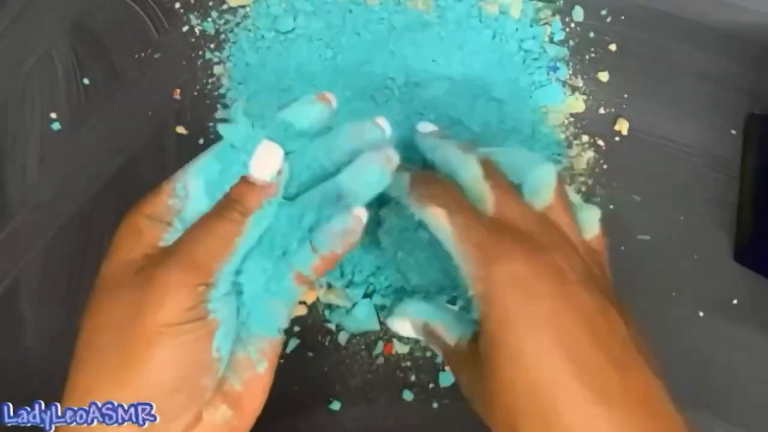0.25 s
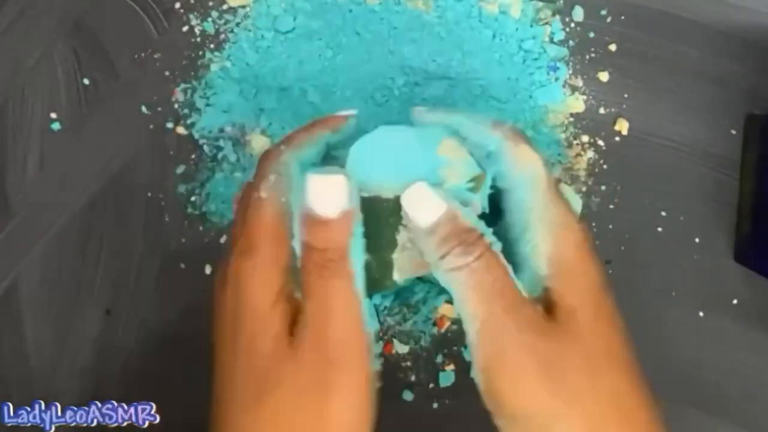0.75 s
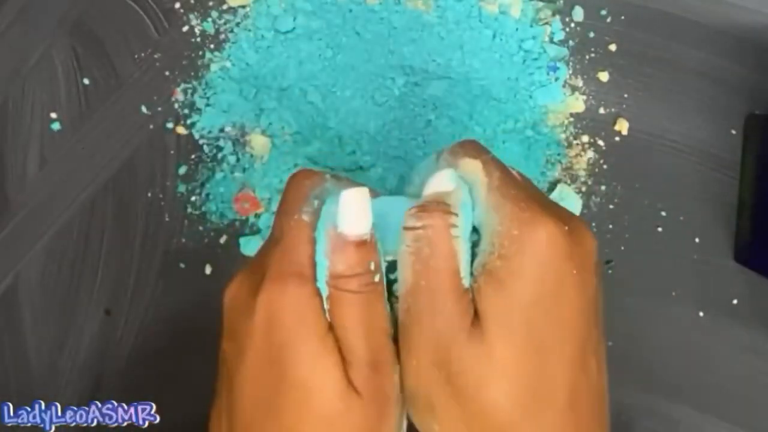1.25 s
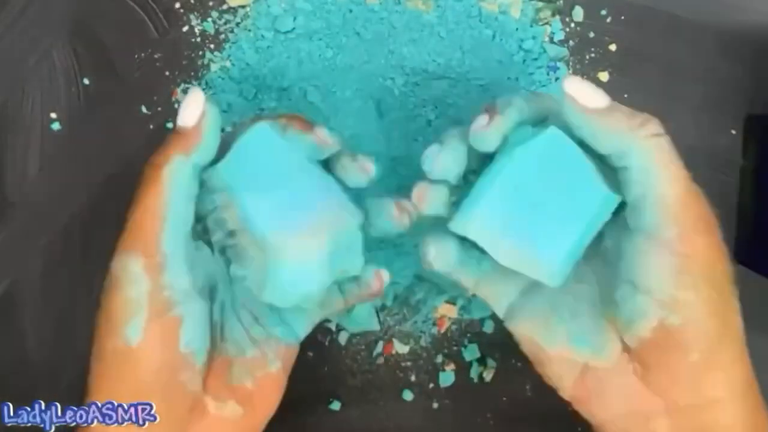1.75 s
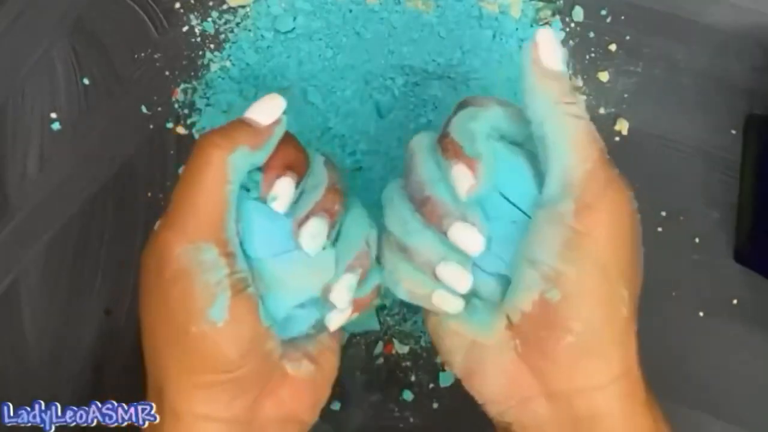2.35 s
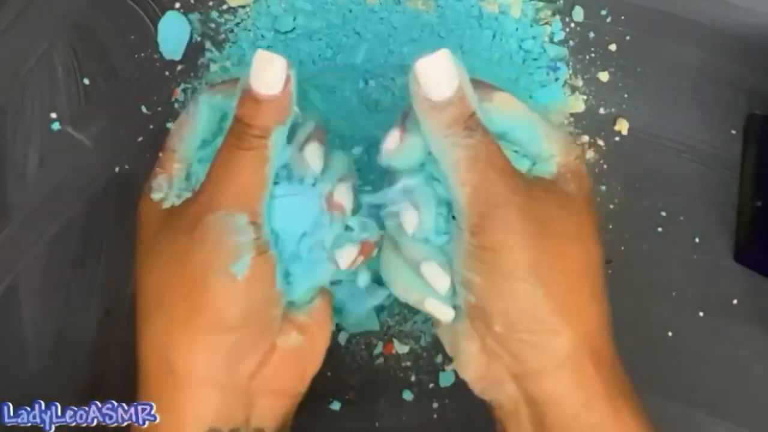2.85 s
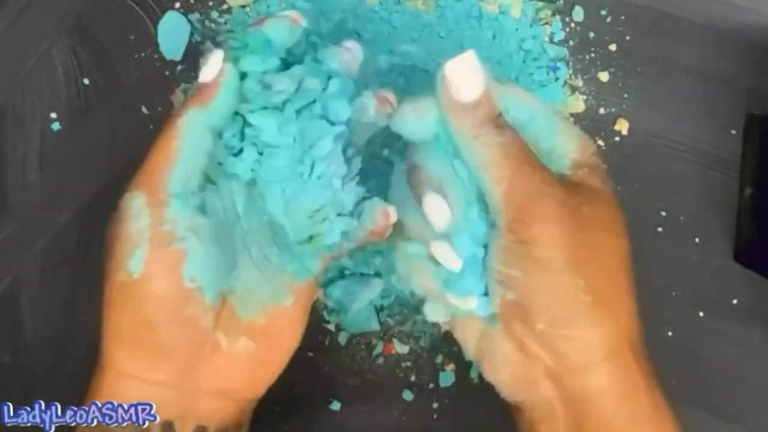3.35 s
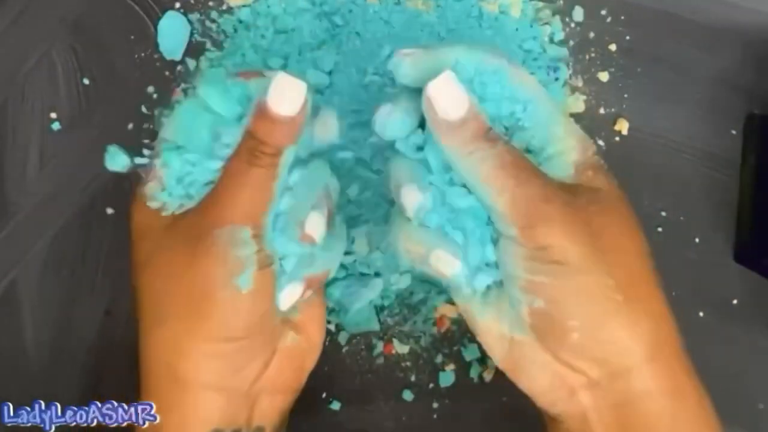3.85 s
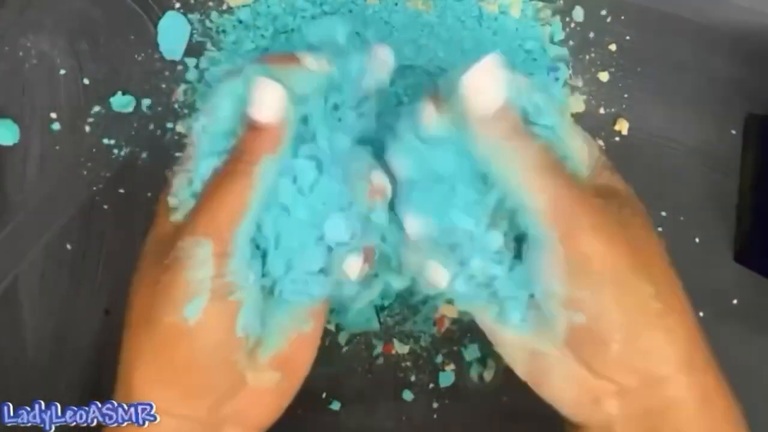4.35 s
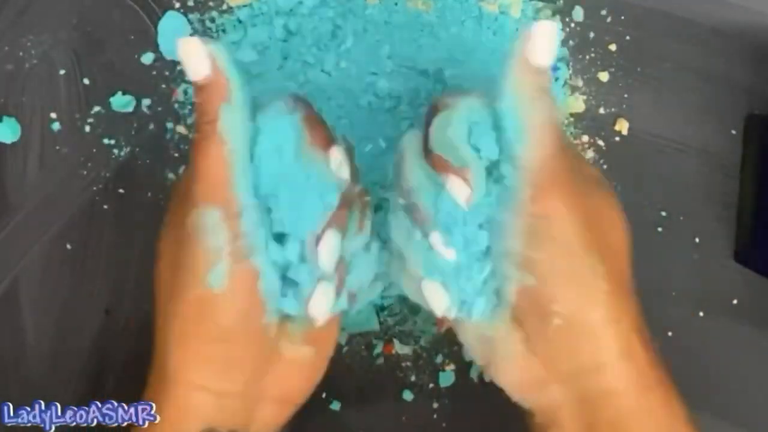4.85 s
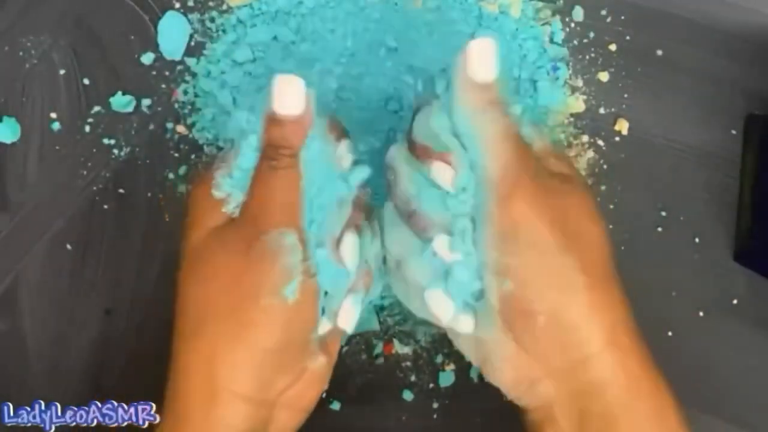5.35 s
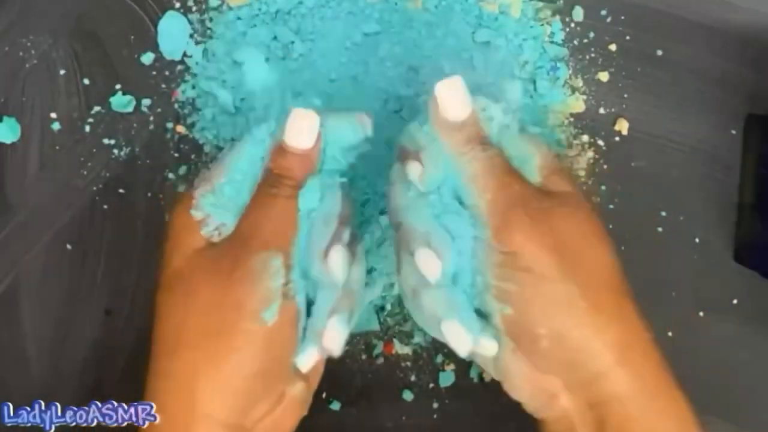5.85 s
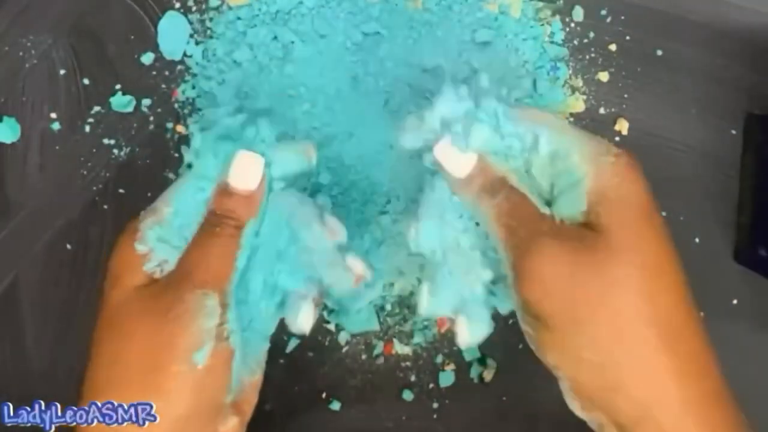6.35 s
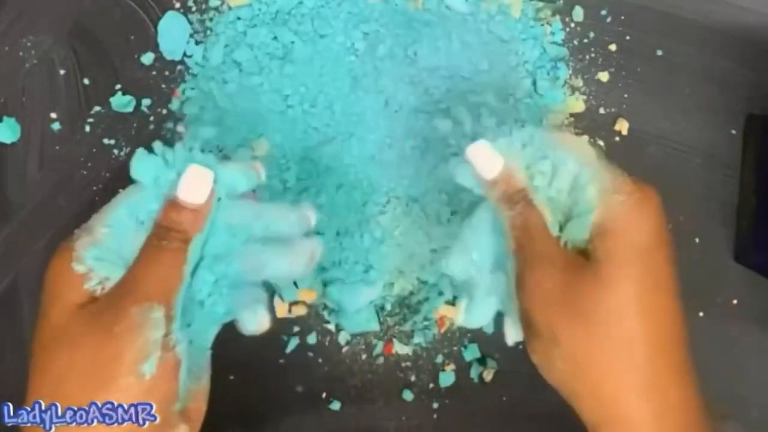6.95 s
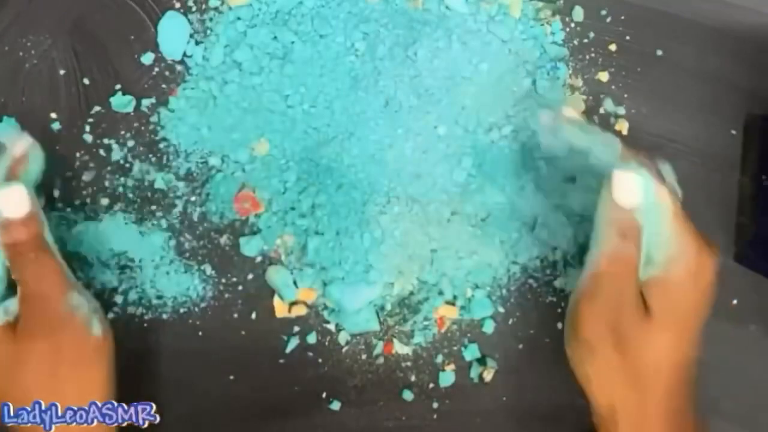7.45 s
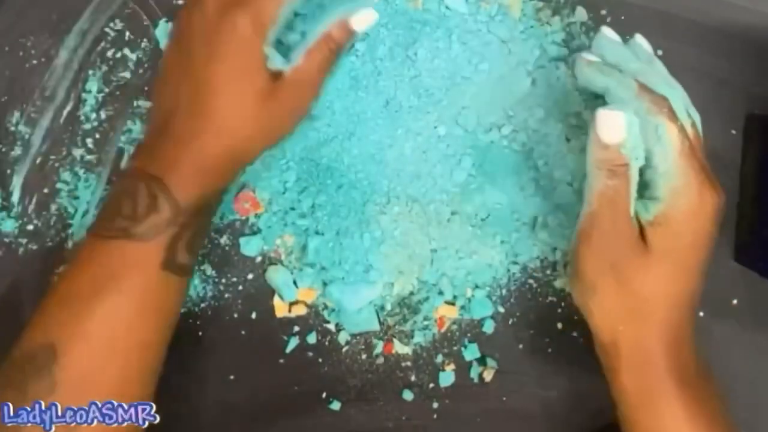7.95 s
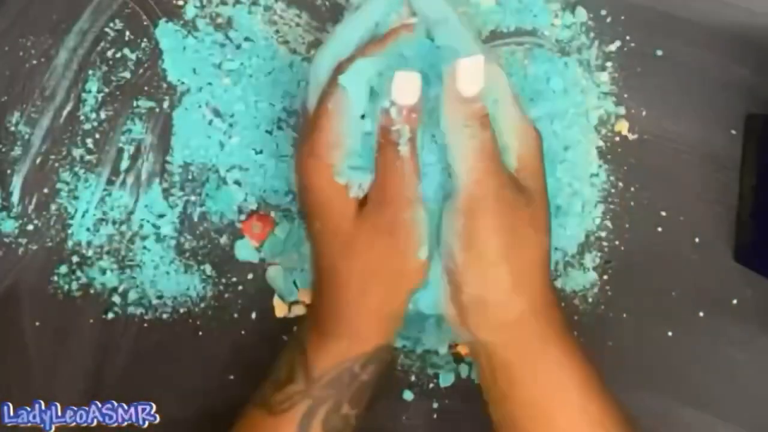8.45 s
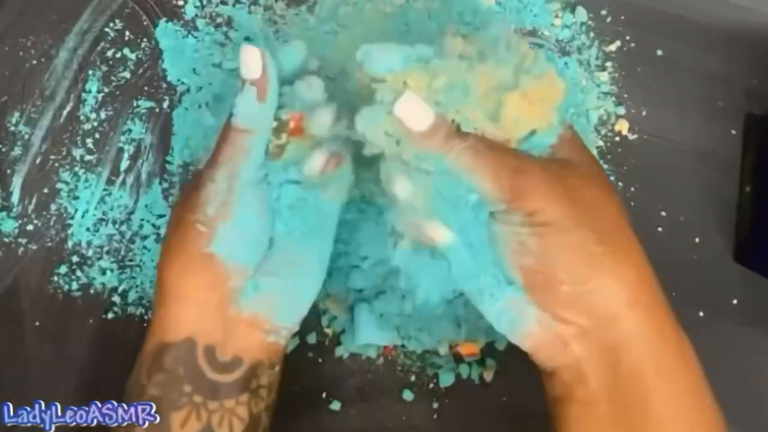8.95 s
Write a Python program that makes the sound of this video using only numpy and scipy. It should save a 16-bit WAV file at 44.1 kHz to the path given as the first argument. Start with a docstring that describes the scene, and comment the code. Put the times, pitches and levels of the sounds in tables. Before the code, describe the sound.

Two hands work soft chalk over a hard table, recorded close in stereo with little room echo. Light powder rubbing comes first, then a sharp split, clustered snaps and irregular crunches with trickling crumbs. These thin into quieter, powdery crackles. Bright, rough sweeping bursts with tumbling pieces follow, loudest of all in grit, then a sharp crack and a few more crumbling squeezes over low rumble.

```python
"""Soft chalk is broken, crushed to powder and swept together on a table by two hands.
Lumps crack as noise bursts through four resonances; crumbs trickle and rustle as noise in six bands of grains.
Thumps are falling tones in the table top, squeaks narrow noise; a low hum wavers in the room.
A phone with two microphone ports lies close by, so the treble reaches the left port a little late."""
import sys
import numpy as np
from scipy import signal
from scipy.fft import rfft, irfft
from scipy.io import wavfile
from scipy.ndimage import uniform_filter1d

SR = 44100
rng = np.random.default_rng(int(sys.argv[2]) if len(sys.argv) > 2 else 0)


def transcribe(u):
    """Save the signal u as a 16-bit wav file named by the first command-line argument.

    u: samples, shape (n,) or (channels, n), limited to [-1, 1]; the rate is SR.
    q: integer samples, one column per channel.
    """
    v = np.clip(np.atleast_2d(u).T, -1, 1)
    q = np.round(v * 32767).astype(np.int16)
    wavfile.write(sys.argv[1], SR, q)


def attenuation_scalar(level_db):
    """Turn a level in dB into a linear amplitude multiplier (20 dB per decade)."""
    decades = np.asarray(level_db, float) / 20
    return 10 ** decades


N = 406161

BASS_LEFT_DB = 3.5  # low chalk sound leans left
HUM_PAN_DB = 4.5  # hum and thumps lean left


def curve(table, column):
    """One column of a time table, at every sample."""
    rows = np.array(table)
    return np.interp(np.arange(N) / SR, rows[:, 0], rows[:, column])


def along_hz(table):
    """A (Hz, value) table at every frequency bin, interpolated over log frequency."""
    hz, value = np.transpose(table)
    bin_hz = np.arange(N // 2 + 1) * SR / N
    return np.interp(np.log(bin_hz + 1), np.log(hz), value)


def unit(x):
    """Scale to rms 1."""
    return x / np.sqrt(np.mean(x ** 2))


def band(x, lo_hz, hi_hz, order=2):
    """Band-pass between two edges."""
    edges_hz = [lo_hz, min(hi_hz, SR / 2.2)]
    return signal.sosfilt(signal.butter(order, edges_hz, "bandpass", fs=SR, output="sos"), x)


def ring(x, hz, width_hz):
    """One resonance."""
    return signal.lfilter(*signal.iirpeak(hz, hz / width_hz, fs=SR), x)


def sides(pan_db):
    """Left and right gains; positive leans left."""
    return attenuation_scalar(np.array([pan_db, -pan_db]) / 2)


def two_ports(noise, likeness):
    """From three unrelated noises, a left and a right that share the first."""
    likeness = np.clip(likeness, 0, 1)
    return np.sqrt(likeness) * noise[0] + np.sqrt(1 - likeness) * noise[1:]


def walk(rate):
    """Slow chance with spread 1: noise averaged twice over 1/rate s."""
    size = int(SR / rate)
    return unit(uniform_filter1d(uniform_filter1d(rng.standard_normal(N), size=size), size=size))


# Kneading, in four stretches. Each row: time in s, then crushing, rubbing and tumbling lumps in dB before the crumb mix.
KNEADING = [
    [(0.0, -57.5, -51, -29), (0.12, -60.5, -55, -60), (0.56, -64.5, -52.5, -59), (0.74, -70, -57.5, -48),
     (0.91, -69, -55, -99), (1.0, -66, -48, -63.5), (1.06, -66, -47, -54), (1.13, -67.5, -60.5, -51),
     (1.24, -65.5, -64, -56), (1.47, -62.5, -67.5, -55), (1.55, -49.5, -78, -26), (1.62, -54.5, -60, -39),
     (1.68, -62.5, -39.5, -87), (1.73, -60, -42.5, -75), (1.83, -53.5, -47.5, -58),
     (1.89, -54.5, -35.5, -59), (2.05, -54, -50, -71)],
    [(2.06, -52.5, -44, -59), (2.16, -52, -44, -63), (2.31, -42.5, -57, -55), (2.64, -42, -43, -54),
     (2.77, -47, -45, -33), (2.94, -40, -42, -44), (3.16, -48.5, -51, -82), (3.42, -51, -47, -38),
     (3.58, -61.5, -79, -58), (3.81, -55.5, -41.5, -39), (3.97, -47.5, -46, -48), (4.03, -46.5, -45, -46),
     (4.08, -47.5, -44, -45), (4.15, -39, -44.5, -45), (4.3, -34.5, -44, -35), (4.39, -45.5, -54, -45),
     (4.49, -54.5, -51, -48), (4.58, -46, -43, -40.5), (4.67, -44, -46, -40), (4.76, -49.5, -43, -60),
     (4.86, -49.5, -46, -52), (4.95, -59.5, -44.5, -59)],
    [(4.96, -61, -53, -68), (5.05, -62, -55, -55), (5.12, -58, -54, -47), (5.16, -53.5, -44.5, -47.5),
     (5.3, -46, -49.5, -41), (5.37, -50, -46.5, -54), (5.47, -52.5, -46, -58), (5.54, -53, -49, -62),
     (5.6, -66, -54.5, -68), (5.655, -63.5, -57, -63), (5.69, -55.5, -56, -57), (5.75, -52.5, -47, -42.5),
     (5.86, -46.5, -51, -46), (5.94, -46.5, -44, -48), (6.05, -56, -52.5, -55), (6.15, -51, -56, -39),
     (6.23, -56, -62, -53), (6.3, -50, -50.5, -57), (6.42, -55.5, -52, -56), (6.52, -53.5, -48, -46),
     (6.62, -57, -49, -55), (6.69, -61.5, -55, -51), (6.78, -57, -52, -53), (6.88, -57, -54.5, -52),
     (6.97, -56.5, -45.5, -39), (7.05, -59, -49.5, -58), (7.14, -64, -52.5, -66), (7.2, -55, -47.5, -59),
     (7.3, -56.5, -50.5, -37), (7.38, -62.5, -53.5, -56), (7.48, -72.5, -57.5, -70), (7.6, -60.5, -60, -33)],
    [(8.46, -44, -66, -39), (8.54, -41, -51, -35), (8.602, -47, -51, -39), (8.66, -40.5, -53, -32),
     (8.742, -45, -51, -42), (8.8, -51, -48.5, -41), (8.858, -53, -50.5, -59), (9.008, -50, -52.5, -50),
     (9.21, -45.5, -45, -37)],
]
# The left hand sweeps the heap together. Each row: the same columns.
SWEEP = [(7.63, -63, -56, -75), (7.67, -27, -43, -40.5), (7.73, -35.5, -36, -25), (7.79, -23, -32.5, -28),
         (7.85, -24, -34.5, -36.5), (7.9, -24.5, -36.5, -42), (7.936, -38.5, -36.5, -33),
         (7.99, -34, -38.5, -29.5), (8.046, -31.5, -42, -38), (8.096, -33, -42.5, -16.5),
         (8.15, -33.5, -43, -23.5), (8.222, -35, -40.5, -29), (8.294, -30.5, -39.5, -17),
         (8.362, -44, -46.5, -34.5), (8.4, -40, -47.5, -21.5), (8.43, -47.5, -54, -51)]


def work():
    """Crushing, rubbing and tumbling levels of the hands at every sample, in dB."""
    rows = sorted(sum(map(list, KNEADING), list(SWEEP)))
    return np.array([curve(rows, k) for k in range(1, 4)])


def octaves_from(size, hz):
    """Distance of a pitch from the middle of a crumb size's band."""
    return np.abs(np.log2(hz / np.sqrt(size[0] * size[1])))


SHOWER_DB_PER_OCTAVE = 3.5
SHOWER_FADE_S, SHOWER_FADE_EXPONENT = 0.017, 0.0099  # fade at 1000 Hz, longer for coarse crumbs


def shower(size, db):
    """Power of one crumb size running off after each crack: most near its knock pitch, powder after a bright snap."""
    s, snap_db, knock_db, hz, _ = np.transpose(CRACKS)
    if size in CRUMB_SIZES[-2:]:
        source_db = snap_db
    else:
        source_db = knock_db - SHOWER_DB_PER_OCTAVE * octaves_from(size, hz)
    power = np.zeros(N)
    power[(s * SR).astype(int)] = attenuation_scalar(db + source_db) ** 2
    fade_s = SHOWER_FADE_S * (1000 / size[0]) ** SHOWER_FADE_EXPONENT
    return signal.lfilter([1], [1, -np.exp(-1 / (fade_s * SR))], power)


# Lumps giving way. Each row: start in s, level in dB at the crumb pitch before the rise, crumb pitch in Hz, fade in s.
COLLAPSES = [(.001, -18, 540, 0.0046), (0.268, -23, 433, 0.016), (.17, -37, 4550, 0.051),
             (.53, -62, 1000, 0.016), (0.669, -41.5, 2000, 0.014), (.893, -31, 11000, 0.0084),
             (1.5, -16.5, 447, 0.028), (1.505, -27.5, 760, 0.028), (1.83, -28, 484, 0.019),
             (2.11, -36, 2500, 0.039), (2.24, -24, 4930, 0.043), (2.344, -20.5, 2370, 0.041),
             (2.595, -26, 520, 0.03), (2.599, -28, 1510, 0.075), (2.74, -24, 600, 0.024),
             (2.9, -38, 1810, 0.077), (3.06, -30.5, 2520, 0.038), (3.48, -22.5, 3680, 0.03),
             (3.81, -40.5, 2500, 0.19), (4.0, -28.5, 750, 0.011), (4.21, -20.5, 1870, 0.06),
             (4.649, -29.5, 2400, 0.06), (5.28, -36, 1890, 0.091), (5.9, -40, 2500, 0.03),
             (6.08, -52, 1800, 0.043), (6.26, -37.5, 1830, 0.045), (6.583, -24, 430, 0.0081),
             (6.6, -46, 400, 0.028), (6.96, -43.5, 344, 0.046), (6.995, -39.5, 335, 0.04),
             (7.07, -41, 496, 0.016), (8.45, -33, 4350, 0.053)]
COLLAPSE_DB_PER_OCTAVE, COLLAPSE_RISE_S = 11.5, 0.00092


def collapse(size):
    """Power of the crumbs of one size that pour out while lumps give way."""
    t, power = np.arange(0, N, 64) / SR, 0
    for s, db, hz, fade_s in COLLAPSES:
        after = np.maximum(t - s, 0)
        peak = attenuation_scalar(db - COLLAPSE_DB_PER_OCTAVE * octaves_from(size, hz)) ** 2
        power = power + peak * (1 - np.exp(-after / COLLAPSE_RISE_S)) * np.exp(-after / fade_s)
    return np.interp(np.arange(N) / SR, t, power)


DENSE_DB, DENSE_PER_DB = -40, 0.015  # above this level grains overlap and merge into hiss


def crumbs(size, level_db, crackle):
    """Tiny grains of uneven size, each a short puff, over the hiss of sliding powder."""
    lo_hz, hi_hz, rate, spread_db, smooth, likeness = size
    falls = rng.random(N) < rate / SR
    falls = falls * attenuation_scalar(spread_db * np.minimum(rng.exponential(size=N), 3.5)) + crackle
    puffs = unit(signal.lfilter([1], [1, -np.exp(-lo_hz / SR / 3.16)], falls))
    smooth = np.clip(smooth + DENSE_PER_DB * np.maximum(level_db - DENSE_DB, 0), 0, .9)
    power = (1 - smooth) ** 2 + smooth ** 2 + 2 * smooth * (1 - smooth) * np.mean(puffs)
    envelope = ((1 - smooth) * puffs + smooth) / np.sqrt(power)
    mix = envelope * two_ports(rng.standard_normal((3, N)), likeness)
    return attenuation_scalar(level_db) * unit(band(mix, lo_hz, hi_hz, order=3))


# Crumb sizes, coarse to fine. Each row: lowest and highest Hz, grains per s, size spread in dB,
# least share of smooth hiss 0-1, likeness at the two ports 0-1.
CRUMB_SIZES = [(211, 560, 220, 5, 0, 0.5), (578, 1040, 200, 5.5, 0.15, 0.11),
               (1000, 1690, 340, 3, 0.28, 0.14), (1640, 4420, 310, 6, 0.74, 0.22),
               (3840, 8800, 2000, 1, 0.5, 0.99), (7700, 13850, 2700, 8, 0.65, 0.99)]
# Mix for each size. Each row: relative weights of crushing, rubbing and tumbling, level offset in dB, shower over its crack in dB.
CRUMB_MIX = [(0.18, 0, 0.68, -0.5, -12), (0.84, 0, 0.24, 0, -12), (0.52, 0.11, 0.084, 0, -17.5),
             (0.37, 0.61, 0.27, -0.5, -10), (0.066, 0.92, 0.026, 2.5, -19.5),
             (-0.069, 2.1, 0.048, 2.5, -36)]
CRUMB_PAN_DB, SWEEP_PAN_DB = -2, 4.5  # the second is added while sweeping
FLICKER_PER_S, FLICKER_DB = 42, 1.5
CRACKLE_PER_S, CRACKLE_DB = 70, 12  # crumbs that break sound in all sizes at once


def crumble(hands):
    """Six sizes of crumbs: tumbling and crushing free the coarse ones, rubbing the fine ones, and cracks shed more."""
    t = np.arange(N) / SR
    sweeping = 1. * (t > SWEEP[0][0]) * (t < SWEEP[-1][0])
    pan_db = CRUMB_PAN_DB + SWEEP_PAN_DB * uniform_filter1d(sweeping, size=2000)
    crackle = (rng.random(N) < CRACKLE_PER_S / SR) * attenuation_scalar(CRACKLE_DB + 3.5 * rng.standard_normal(N))
    out = 0
    for size, (*shares, db, shower_db) in zip(CRUMB_SIZES, CRUMB_MIX):
        steady_db = np.dot(shares, hands) / np.sum(shares) + db + FLICKER_DB * walk(FLICKER_PER_S)
        level_db = 10 * np.log10(attenuation_scalar(steady_db) ** 2 + shower(size, shower_db) + collapse(size))
        lean_db = pan_db * min(600 / size[0], 1) + BASS_LEFT_DB * min(250 / size[0], 1)
        out = out + crumbs(size, level_db, crackle) * sides(lean_db)
    return out


# Noise around the low note. Each row: centre in Hz, first resonance width in Hz, level against the note in dB.
HUM_NOTES = [(43.5, 21.4, -5.5), (53.4, 9.9, -6), (67.5, 15.4, -10)]
# Rumble resonances. Each row: centre in Hz, first resonance width in Hz, relative level in dB.
RUMBLE = [(120.7, 31, 9.5), (174.5, 13.3, 2), (92.4, 24, 7)]
# Swells of the low note. Each row: centre in s, height in dB before pan, half length to 1/e in s.
SWELLS = [(0.001, -22, 0.022), (0.253, -39.5, 0.079), (0.52, -25.5, 0.084), (0.68, -31.5, 0.12),
          (0.87, -26, 0.064), (1.206, -26, 0.059), (1.48, -27, 0.053), (1.61, -27, 0.029),
          (1.878, -32, 0.076), (2.316, -30.5, 0.076), (2.607, -33, 0.061), (2.8, -30.5, 0.085),
          (3.026, -33.5, 0.057), (3.51, -28.5, 0.14), (3.714, -40, 0.11), (3.849, -24, 0.014),
          (3.973, -32, 0.05), (4.132, -24.5, 0.035), (4.34, -29.5, 0.11), (4.628, -31, 0.11),
          (4.867, -32.5, 0.092), (5.036, -43, 0.045), (5.213, -31, 0.027), (5.363, -27.5, 0.066),
          (5.583, -30, 0.12), (5.945, -34, 0.1), (6.21, -37.5, 0.083), (6.69, -30, 0.092),
          (7.06, -27.5, 0.075), (7.234, -34, 0.13), (7.443, -36, 0.12), (7.676, -26, 0.025),
          (7.797, -24.5, 0.035), (7.995, -25, 0.025), (8.084, -32, 0.02), (8.27, -28, 0.083),
          (8.52, -38, 0.16), (8.794, -36, 0.15), (9.008, -33, 0.043), (9.204, -35, 0.07)]
# Rumble level. Each row: time in s, level in dB before RUMBLE_DB.
RUMBLE_LEVEL = [(0.0, -48.5), (0.51, -44), (2.13, -43.5), (2.97, -45), (3.15, -46), (4.08, -45),
                (4.46, -52), (5.13, -40), (5.59, -45), (7.08, -46.5), (7.36, -61.5), (7.64, -43.5),
                (7.92, -31.5), (8.18, -35), (8.57, -41), (9.21, -41.5)]
HUM_HZ, HUM_WAVER_HZ, HUM_REST_DB = 58.43, 3.26, -38
RUMBLE_DB, RUMBLE_WAVER_DB = 4.5, 2.5
HUM_APART, RUMBLE_APART = .3, 0.32  # unshared noise against shared


def hum():
    """A low note that wavers in pitch and noise in low resonances, nearly alike in both ports and louder on the left."""
    t = np.arange(N) / SR
    note_hz = HUM_HZ + HUM_WAVER_HZ * walk(15.5)
    note = np.sqrt(2) * np.sin(2 * np.pi * np.cumsum(note_hz) / SR)
    swell = attenuation_scalar(HUM_REST_DB) + sum(attenuation_scalar(db) * np.exp(-((t - s) / length_s) ** 2) for s, db, length_s in SWELLS)
    rumble = attenuation_scalar(curve(RUMBLE_LEVEL, 1) + RUMBLE_DB + RUMBLE_WAVER_DB * walk(20))
    out = 0
    for gain, notes, tone, apart in ((swell, HUM_NOTES, note, HUM_APART), (rumble, RUMBLE, 0, RUMBLE_APART)):
        noise = rng.standard_normal(N) + apart * rng.standard_normal((2, N))
        drone = tone + sum(attenuation_scalar(db) * unit(ring(ring(noise, hz, w), hz, 2 * w)) for hz, w, db in notes)
        out = out + gain * unit(drone)
    return out * sides(HUM_PAN_DB)[:, None]


# Loud cracks. Each row: peak time in s, snap in dB before SNAP_DB, knock in dB before KNOCK_DB,
# knock pitch in Hz, tick over snap in dB before TICK_DB.
CRACKS = [(0.171, -39, -68, 870, -7), (0.2448, -28.5, -39, 1330, -5), (0.2676, -41, -36, 825, 7),
          (0.32, -49, -39, 700, 1), (0.492, -45, -36.5, 1430, -9), (0.527, -45, -36.5, 900, -1),
          (0.7062, -24.5, -32.5, 1560, -11), (1.1346, -37.5, -42, 1500, -6), (1.177, -57.5, -72, 1500, 3),
          (1.383, -45, -45, 1200, -19), (1.487, -13, -12.5, 820, -7), (1.4993, -19.5, -38, 900, -1.5),
          (1.7397, -11, -26, 950, -7.5), (1.8237, -13.5, -17, 775, -21), (2.1035, -19.5, -38.5, 2390, -8),
          (2.151, -22, -31, 1320, -30), (2.161, -26, -30.5, 935, -16), (2.192, -13, -37, 1190, 0),
          (2.1973, -17, -21.5, 1500, -6), (2.2062, -15, -34, 1080, -11), (2.2201, -6, -19.5, 850, -28),
          (2.2395, -0.5, -11, 1260, -6), (2.249, -19, -39, 1500, -17), (2.2714, -3, -14, 1880, -9),
          (2.3038, -4.5, -21, 1630, -14), (2.3326, -20, -44, 2160, -6), (2.358, -19, -19, 970, -28),
          (2.5879, -9.5, -9, 1220, -12), (2.5914, -18, -16, 2300, -18), (2.5998, -45.5, -23, 685, -17),
          (2.647, -30, -24, 1610, -20), (2.6535, -17.5, -15.5, 1290, -2), (2.691, -22, -24, 2200, -8),
          (2.696, -14, -22, 600, -4.5), (2.7375, -22, -17, 1150, -7), (2.7567, -17, -34, 724, -18),
          (2.887, -21, -40, 1240, -13), (2.8945, -11, -17, 1550, -9.5), (2.9235, -29, -52, 651, -2),
          (2.9425, -30, -38, 1560, -13), (2.972, -26, -31, 960, -3), (2.987, -40, -30, 900, -10),
          (2.999, -24, -22, 980, 0.5), (3.008, -27, -33, 1150, -3), (3.026, -30, -22, 1500, -6),
          (3.0335, -29, -45, 1500, 1), (3.0565, -30, -47, 1850, -14), (3.0577, -9.5, -23, 2140, -6),
          (3.074, -23, -50, 2250, -5), (3.0936, -23, -45, 969, -3), (3.114, -23, -28, 1180, -7),
          (3.1348, -23, -51, 1140, -26), (3.1474, -42, -32.5, 1100, -11), (3.1837, -32, -59, 2200, -2),
          (3.2517, -29.5, -37, 1950, -18), (3.4364, -21.5, -34, 1200, -9), (3.4514, -19.5, -34, 1060, -11),
          (3.4581, -20, -24.5, 980, -5), (3.466, -17.5, -24, 1690, -3), (3.4774, -4.5, -17.5, 895, -8),
          (3.487, -21.5, -26, 1670, 10), (3.4894, -11.5, -33, 1500, -15), (3.4984, -24.5, -34, 950, 8),
          (3.5125, -29, -37, 1500, -15), (3.557, -17.5, -30.5, 690, -7), (3.8023, -19, -16, 2200, -7),
          (3.861, -27, -42, 2280, -19), (3.8838, -23.5, -47, 2280, -35), (3.9614, -16.5, -28, 980, -39),
          (3.9963, -20, -12, 1080, -19), (4.0007, -13.5, -34, 725, -5), (4.0386, -27, -53, 727, -4),
          (4.087, -25.5, -29, 1170, -20), (4.1934, -11.5, -21, 1720, -5.5), (4.2031, -6.5, -3, 1690, -13),
          (4.2913, -16, -19.5, 930, -16), (4.4142, -31, -27, 790, -16), (4.468, -36, -41, 1000, -3),
          (4.5014, -32, -35, 2150, -3), (4.5128, -27.5, -31, 800, -17), (4.536, -26, -47, 1520, -17),
          (4.553, -20.5, -30, 2250, -14), (4.594, -23.5, -46, 744, -7), (4.6447, -16, -24, 1420, -17),
          (4.705, -34, -29, 1000, -15), (4.719, -30, -26.5, 880, -18), (4.781, -19.5, -38, 1130, -16),
          (4.814, -30, -32, 990, 0), (4.833, -32, -31, 1380, -15), (4.844, -38, -32, 1000, -15),
          (4.906, -28, -29, 1010, -4), (4.9363, -27, -39, 923, -20), (5.061, -27.5, -41, 950, -12),
          (5.132, -34, -44, 1200, -14), (5.146, -43, -35, 1000, -12), (5.1754, -25.5, -31.5, 1650, -21),
          (5.206, -28.5, -37, 1190, -17), (5.2823, -29, -28, 1700, -37), (5.311, -44, -37, 1200, -12),
          (5.378, -40, -39, 1000, -12), (5.4001, -23.5, -27.5, 1050, -14), (5.438, -26, -28.5, 1150, -12),
          (5.4658, -37, -43, 700, -0.5), (5.667, -39, -42, 1820, -15), (5.698, -52, -37, 2200, -12),
          (5.754, -24, -27, 1780, -10), (5.8557, -20, -19.5, 1670, -2.5), (5.8842, -24, -35, 1400, -6.5),
          (5.8959, -10, -22.5, 840, -8), (5.9336, -27, -46, 953, -4), (6.073, -18, -15, 1360, -10.5),
          (6.1529, -36, -29, 1130, -23), (6.196, -51, -36, 900, -17), (6.24, -30, -35, 1510, -16),
          (6.2643, -33, -28, 1650, -9), (6.307, -44, -28.5, 950, -18), (6.363, -47, -43, 1100, -15),
          (6.381, -37, -33, 1000, -15), (6.3874, -42, -35, 1290, -15), (6.439, -35, -50, 1200, -8),
          (6.471, -29, -36.5, 1200, -6), (6.5306, -37, -51, 1570, 2), (6.546, -26.5, -45, 2300, 2.5),
          (6.583, -20.5, -32, 1000, -8.5), (6.651, -35, -44, 2000, -16), (6.725, -31, -41, 1210, -11),
          (6.79, -26, -34, 799, -6), (6.847, -44, -40, 1500, -13), (6.86, -29.5, -40, 2050, -24),
          (6.873, -35, -43, 1480, -16), (6.9438, -43, -32.5, 880, -15), (7.078, -37, -40, 750, -14),
          (7.136, -37, -44, 1800, -6), (7.166, -32.5, -35, 1300, -5), (7.1867, -33, -43, 1420, -3),
          (7.2413, -28.5, -35, 940, -14), (7.2814, -56, -34.5, 910, -13), (7.325, -35, -39, 900, -13),
          (7.351, -48, -38.5, 835, -13), (7.576, -41.5, -37, 910, -1), (8.4395, -7.5, -22.5, 1600, -48),
          (8.4535, -35, -51, 937, -17), (8.51, -45, -28.5, 790, -20), (8.529, -45, -37, 1200, -20),
          (8.56, -34, -32, 1180, -20), (8.612, -30, -34, 719, -20), (8.63, -22, -24.5, 990, -17),
          (8.6765, -22.5, -29, 800, -25), (8.7154, -31, -19, 1330, -28), (8.758, -45, -32, 1200, -20),
          (8.8578, -38, -37, 2160, -21), (8.902, -36.5, -58, 2400, 2), (8.9232, -27.5, -35, 1040, -5),
          (8.967, -32, -36, 1664, -22), (9.0087, -25.5, -32.5, 1090, -8), (9.0258, -29, -53, 860, -1.5),
          (9.196, -27, -28.5, 1417, -2)]
THUD_DB, THUD_DB_PER_OCTAVE, THUD_SPREAD_DB = -13.5, 7.5, 2.5  # thud over the knock, more for low lumps
SNAP_DB, KNOCK_DB, TICK_DB = -4, -1.5, 3.5  # burst level against its peak
SMALL_COUNT, SMALL_DB, SMALL_SPREAD_DB, SMALL_HZ = 14, 8, 3.5, 1500  # small cracks, dB over the crumbling
CRACK_PAN_DB, PAN_SPREAD_DB = 3, -2.5


def breaks(hands):
    """All cracks as (s, thud dB, knock dB, snap dB, tick dB, knock Hz, pan dB); small ones at random, oftener under pressure."""
    chance = rng.standard_normal((SMALL_COUNT, 4))
    outside_sweep = np.abs(np.arange(N) / SR - 8.04) > .4
    busy = np.cumsum(np.sqrt(attenuation_scalar(hands[0])) * outside_sweep)
    at = np.searchsorted(busy, (.01 + .97 * rng.random(SMALL_COUNT)) * busy[-1])
    snap_knock_db = SMALL_DB + hands[1::-1, at].T + SMALL_SPREAD_DB * chance[:, :2]
    small = np.c_[at / SR, snap_knock_db, SMALL_HZ * 2 ** (.3 * chance[:, 2]), -10 + 4 * chance[:, 3]]
    s, snap, knock, hz, bright = np.vstack([CRACKS, small]).T
    odd = rng.standard_normal((len(s), 2))
    thud = knock + THUD_DB + THUD_DB_PER_OCTAVE * np.log2(1000 / hz) + THUD_SPREAD_DB * odd[:, 0]
    pan_db = CRACK_PAN_DB + PAN_SPREAD_DB * odd[:, 1]
    return np.c_[s, thud, knock + KNOCK_DB, snap + SNAP_DB, snap + bright + TICK_DB, hz, pan_db]


# Parts of a crack. Each row: centre in Hz (knock and snap get theirs per crack), first resonance width over centre,
# burst in ms, scatter in ms, scatter share 0-1, likeness at the two ports (held to 0-1), step over noise.
THUD = (420, 1.13, 7.7, 9.2, 0.2, 1.14, 5.5)
KNOCK = (1000, 0.9, 1.5, 5, 0.25, 0.6, 4)
SNAP = (3900, 1.0, 0.7, 8, 0.16, 0.5, 4)
TICK = (7860, 0.96, 0.5, 4.6, 0.25, 0.8, 6)
# Snap pitch, higher while thin edges chip, lower while thick lumps split. Each row: time in s, pitch in Hz.
SNAP_PITCH = [(0, 3870), (1.49, 3800), (1.82, 3300), (2.15, 4400), (2.33, 4550), (2.58, 2780), (2.7, 3540),
              (3.06, 4070), (3.48, 4700), (3.8, 3920), (4.2, 3370), (4.65, 3730), (4.78, 5540), (5.1, 3800),
              (6.07, 3480), (7.3, 3640), (8.44, 4440), (8.7, 3270), (9.21, 3800)]
LUMP_SPREAD_DB = 4


def cracks(rows):
    """Each break creaks briefly, bursts into micro-fractures and scatters crumbs, ringing at four pitches."""
    out, lead = np.zeros((2, N + 4096)), 256
    ms = (np.arange(4096) - lead) * 1000 / SR
    after = np.maximum(ms, 0)
    chance = rng.standard_normal((len(rows), 3, 4096))
    # the break itself: one sharp step, the same at both ports, after the first micro-fractures
    step = 1. * (np.abs(ms - .5) < .03)
    # the strain builds up just before the break
    strain = np.where(ms < 0, 0.7 * np.exp(ms / 0.22) + 0.25 * np.exp(ms / 2.0), 1)
    # the scatter comes in lumps about a millisecond long
    lumps = attenuation_scalar(LUMP_SPREAD_DB * np.repeat(rng.standard_normal((len(rows), 64)), 64, axis=1) + 8.0)
    for (s, *parts_db, knock_hz, pan_db), noise, lump in zip(rows, chance, lumps):
        start = int(s * SR) - lead - 8
        for part, db in zip((THUD, KNOCK, SNAP, TICK), parts_db):
            hz, width, burst_ms, scatter_ms, scatter, likeness, sharp = part
            if part is KNOCK:
                hz = knock_hz
            elif part is SNAP:
                hz = np.interp(s, *np.transpose(SNAP_PITCH))
            fade = np.exp(-after / burst_ms) + scatter * lump * np.exp(-after / scatter_ms)
            push = (two_ports(noise, likeness) + sharp * step) * strain * fade
            rung = ring(ring(push, hz, width * hz), hz, 1.13 * width * hz)
            burst = rung[:, lead - 16:lead + int(2.5 * burst_ms * SR / 1000)]
            rung = rung / np.sqrt(np.mean(burst ** 2))
            # low sound is louder on the near side, the treble more even
            lean_db = pan_db * min(1500 / hz, 1) + BASS_LEFT_DB * min(250 / hz, 1)
            out[:, start:start + 4096] += attenuation_scalar(db) * rung * sides(lean_db)[:, None]
    return out[:, :N]


# Squeaks. Each row: centre in s, level in dB, pitch in Hz, half length to 1/e in s.
SQUEAKS = [(0.876, -46, 5700, 0.014), (0.906, -41, 5750, 0.011), (4.984, -42, 5880, 0.0053),
           (5.282, -32.5, 5880, 0.0077)]
SQUEAK_RING_WIDTH_HZ = 230


def squeaks():
    """Skin slips on packed powder and squeaks faintly in a narrow band."""
    t, out = np.arange(N) / SR, np.zeros(N)
    for s, db, hz, length_s in SQUEAKS:
        near = slice(int((s - .1) * SR), int((s + .1) * SR))
        noise = rng.standard_normal(len(t[near]))
        noise = ring(ring(noise, hz, SQUEAK_RING_WIDTH_HZ), hz, SQUEAK_RING_WIDTH_HZ)
        out[near] += attenuation_scalar(db) * unit(noise) * np.exp(-((t[near] - s) / length_s) ** 2)
    return out


# Thumps. Each row: start in s, peak in dB before pan, first and last pitch in Hz, length in ms.
THUMPS = [(1.488, -12, 474, 90.5, 23), (1.488, -8.5, 1310, 540, 6.8), (1.826, -21, 357, 110, 11),
          (2.587, -6, 784, 420, 7.3), (2.7355, -8.5, 1500, 387, 7.6), (3.995, -12.5, 1540, 523, 6.2),
          (4.2018, -8.5, 2300, 1500, 4.7), (6.581, -29, 1000, 400, 13), (2.895, -21.5, 440, 97, 38),
          (6.582, -33.5, 500, 154, 26), (7.968, -26, 250, 88.5, 10), (8.073, -32, 332, 128, 21)]


def thumps():
    """Bending waves in the table top: the higher part arrives first, so each thump falls in pitch."""
    out = np.zeros(N)
    for s, db, first_hz, last_hz, length_ms in THUMPS:
        along = np.linspace(0, 1, int(length_ms * SR / 1000))
        phase = 2 * np.pi * np.cumsum(first_hz * (last_hz / first_hz) ** along) / SR
        start = int(s * SR)
        out[start:start + len(along)] += attenuation_scalar(db) * np.sin(np.pi * along ** 0.84) * np.sin(phase)
    return out * sides(HUM_PAN_DB)[:, None]


# Room tail. Each row: lowest and highest Hz, total level in dB, t60 in s.
ROOM = [(250, 1020, -20, 0.26), (900, 3100, -22, 0.13)]
ROOM_WAIT_S = 0.01


def echo(x):
    """The room: a decaying scatter of reflections, different at each port; the lower band lingers longer."""
    t, tail = np.arange(SR // 2) / SR, 0
    for lo_hz, hi_hz, db, t60_s in ROOM:
        decay = np.exp(-np.log(1000) * t / t60_s) * (t > ROOM_WAIT_S)
        part = band(rng.standard_normal((2, len(t))) * decay, lo_hz, hi_hz)
        tail = tail + part * attenuation_scalar(db) / np.sqrt(np.sum(part ** 2, axis=1, keepdims=True))
    return signal.fftconvolve(x, tail, axes=1)[:, :N]


def scene():
    """Chalk and table close up, the room behind them and the hum."""
    hands = work()
    chalk = cracks(breaks(hands)) + crumble(hands) + thumps() + squeaks()
    return chalk + echo(chalk) + hum()


def top_cut(x):
    """Nothing passes above the cut-off."""
    return signal.sosfilt(signal.butter(12, 16440, fs=SR, output="sos"), x)


# Microphone response. Each row: frequency in Hz, gain in dB.
COLOUR = [(200, -2), (500, -3), (1200, -3), (2500, -0.5), (4000, -6), (5500, -1), (8000, -1), (11000, -2.5),
          (14000, -8), (16000, -17)]
# Left port phase. Each row: frequency in Hz, lead over the right in radians (negative lags).
PORT_PHASE = [(60, 0), (700, -.6), (2500, -1.0), (5200, -.7), (6400, -1.6), (8000, -3.2), (10000, -4.6),
              (12200, -6.2), (14300, -6.4), (16000, -7.2)]


def record(dry):
    """The left port lags in the treble; the microphones colour the sound and clip at full scale."""
    lag = np.exp(1j * along_hz(PORT_PHASE) * np.array([[1], [0]]))
    heard = irfft(rfft(dry) * lag * attenuation_scalar(along_hz(COLOUR)), N)
    return top_cut(np.clip(heard, -1, 1))


dry = scene()
out = record(dry)
transcribe(out)
```